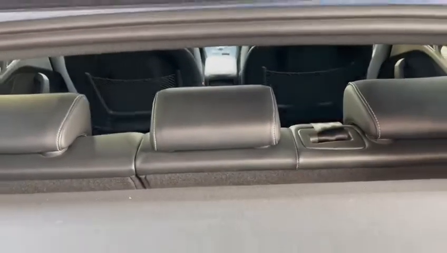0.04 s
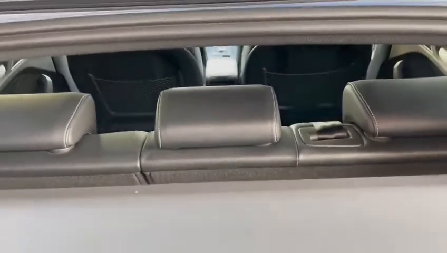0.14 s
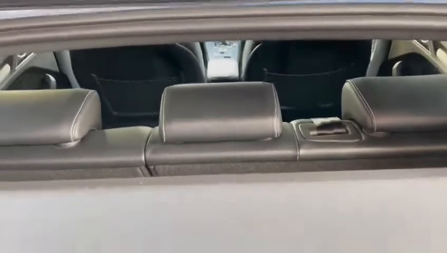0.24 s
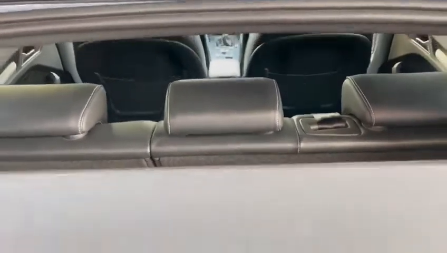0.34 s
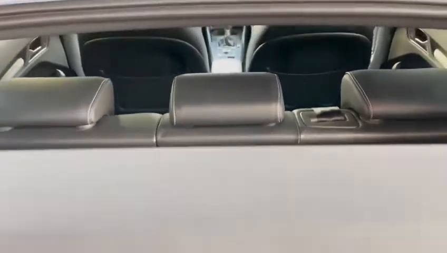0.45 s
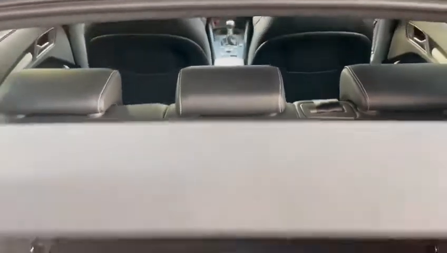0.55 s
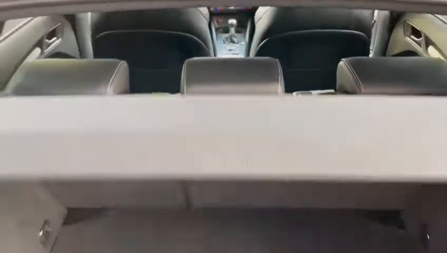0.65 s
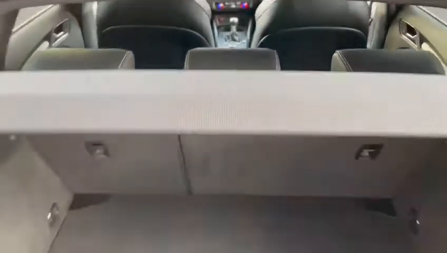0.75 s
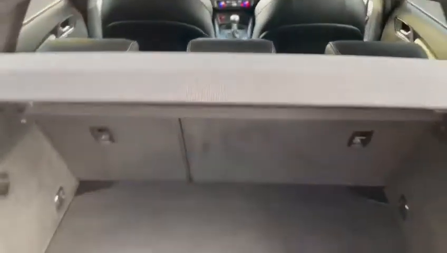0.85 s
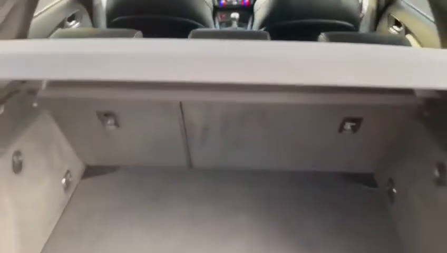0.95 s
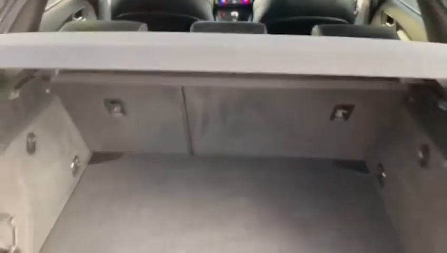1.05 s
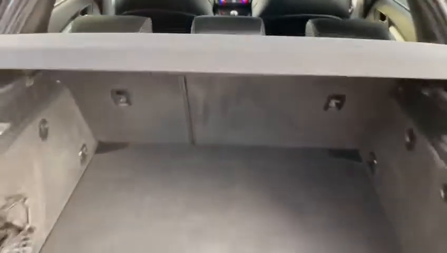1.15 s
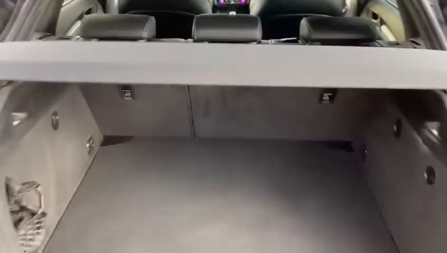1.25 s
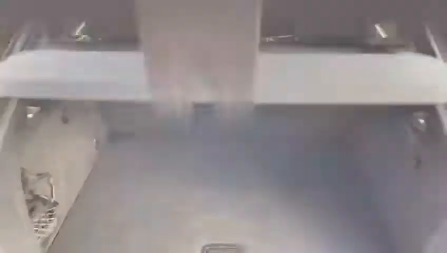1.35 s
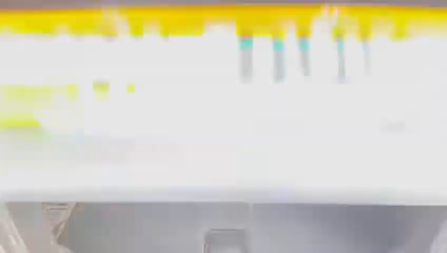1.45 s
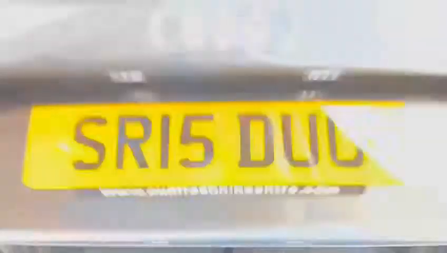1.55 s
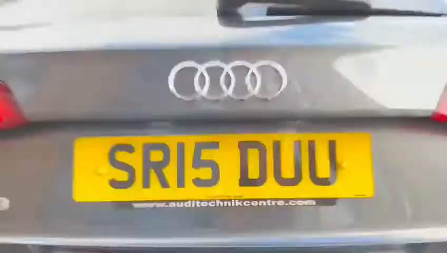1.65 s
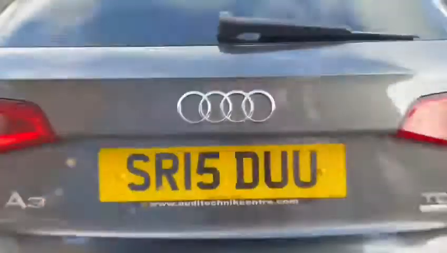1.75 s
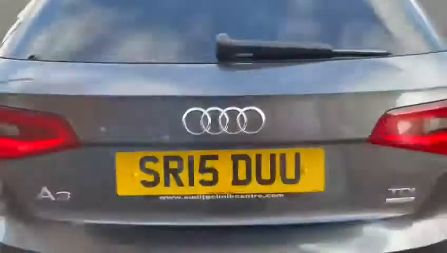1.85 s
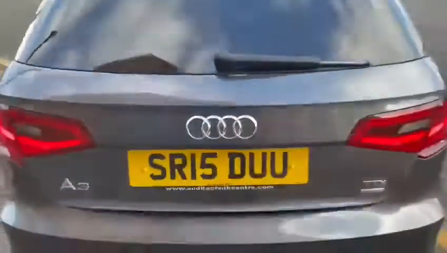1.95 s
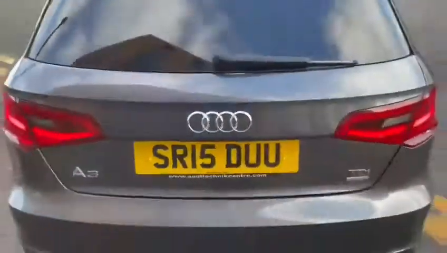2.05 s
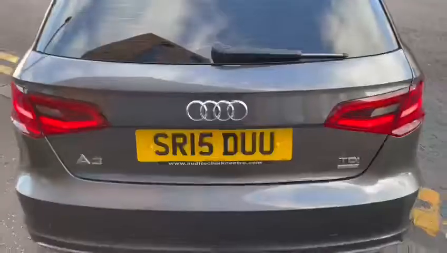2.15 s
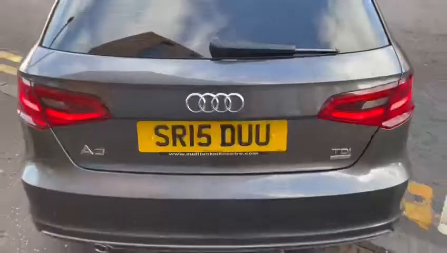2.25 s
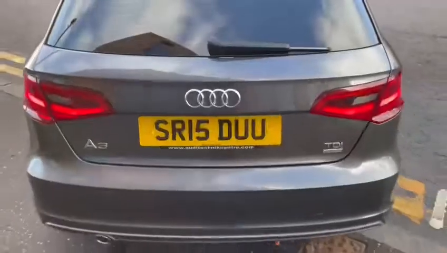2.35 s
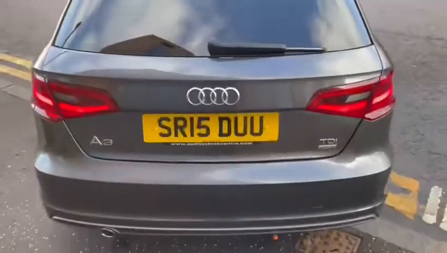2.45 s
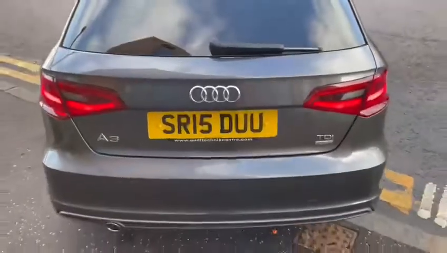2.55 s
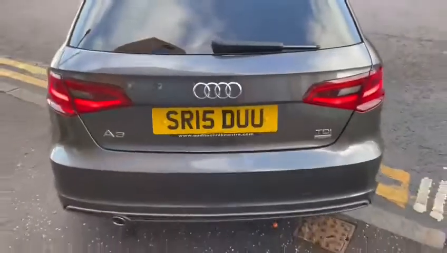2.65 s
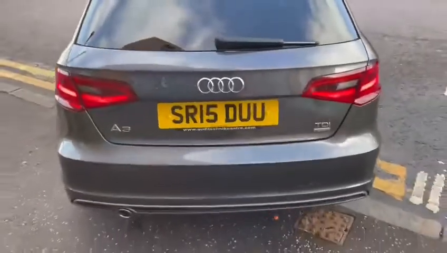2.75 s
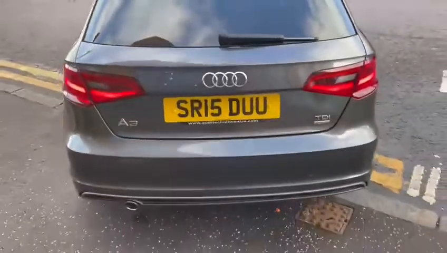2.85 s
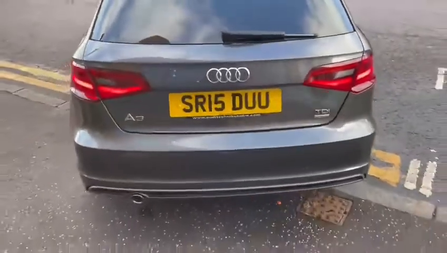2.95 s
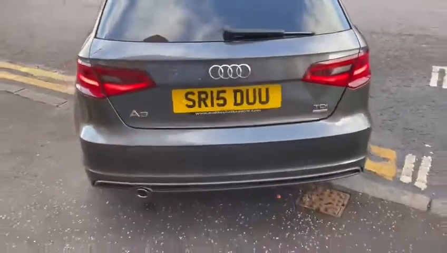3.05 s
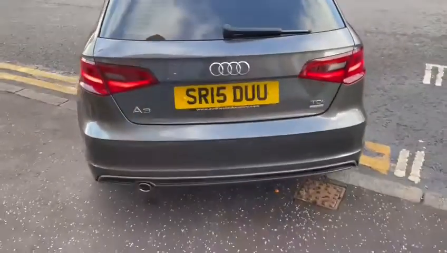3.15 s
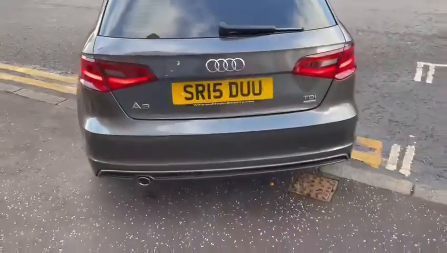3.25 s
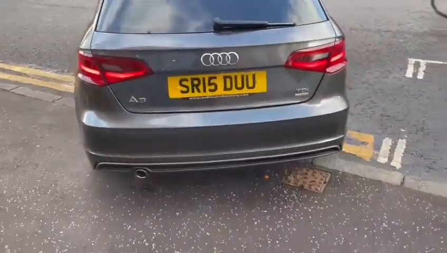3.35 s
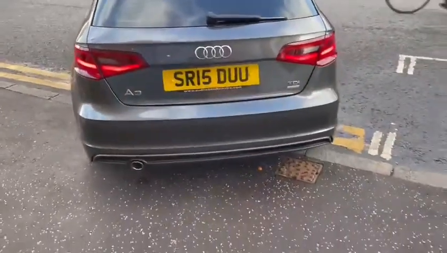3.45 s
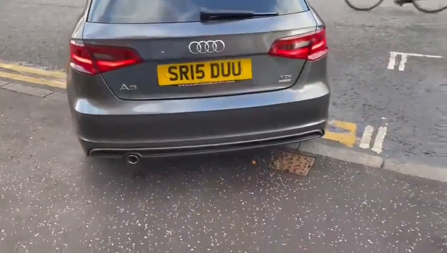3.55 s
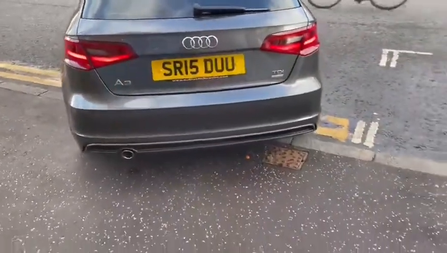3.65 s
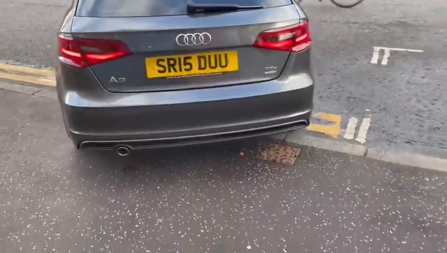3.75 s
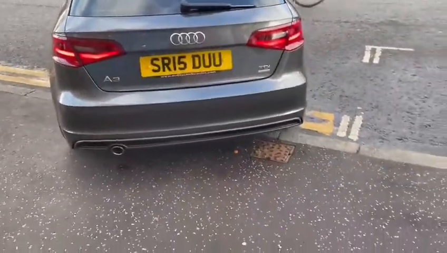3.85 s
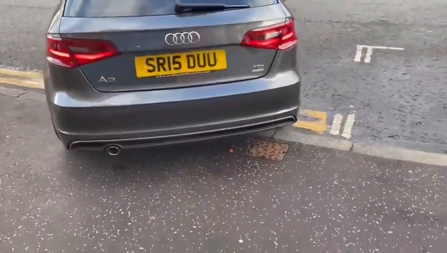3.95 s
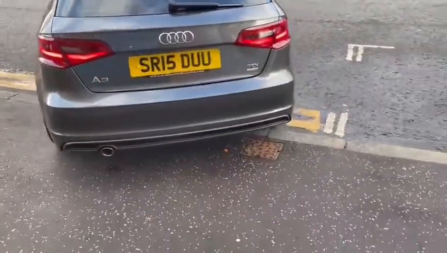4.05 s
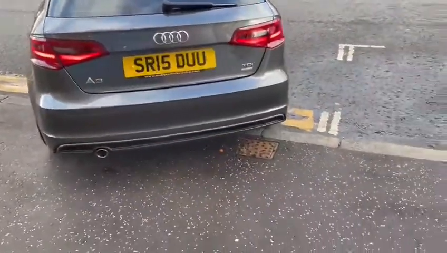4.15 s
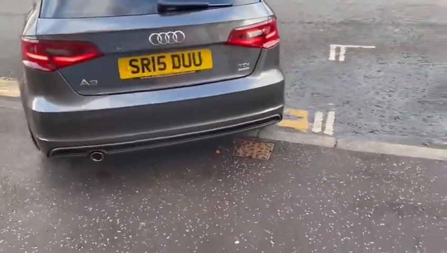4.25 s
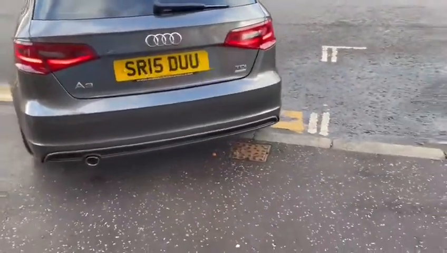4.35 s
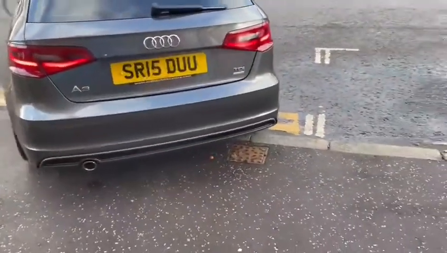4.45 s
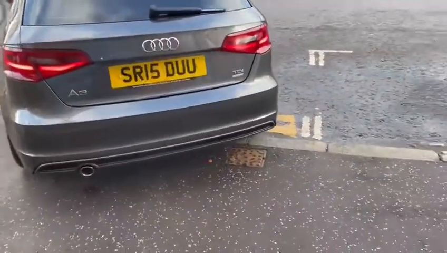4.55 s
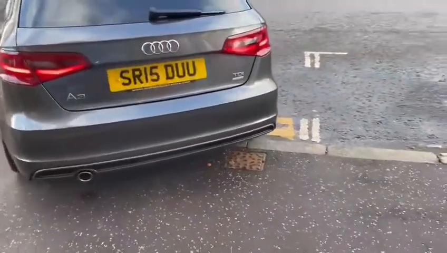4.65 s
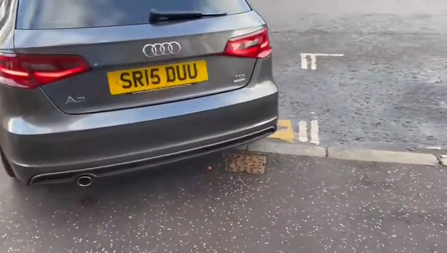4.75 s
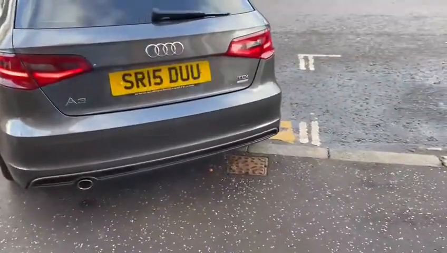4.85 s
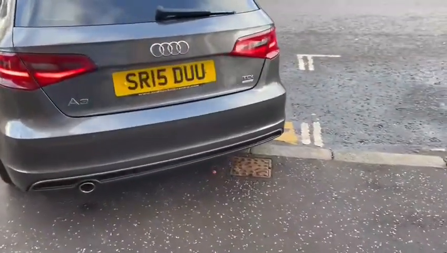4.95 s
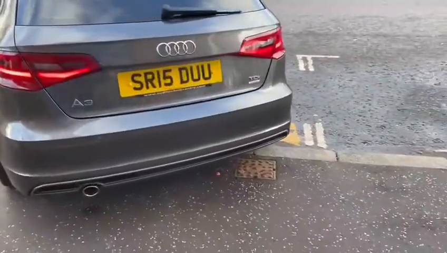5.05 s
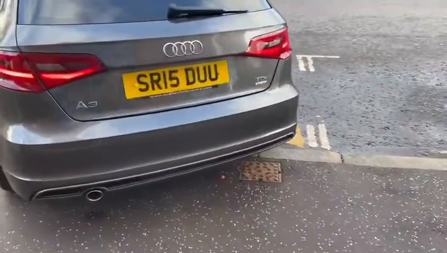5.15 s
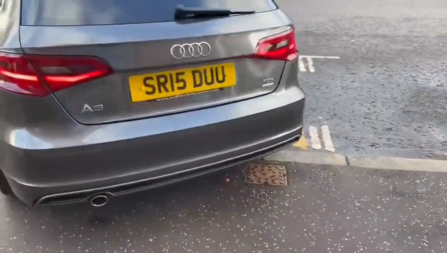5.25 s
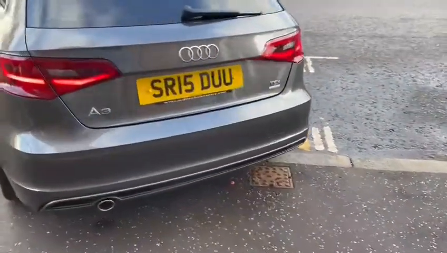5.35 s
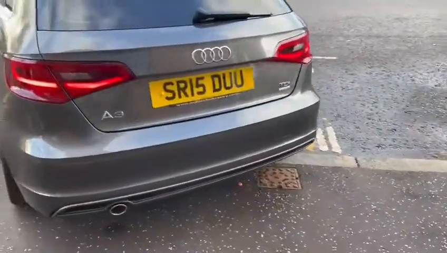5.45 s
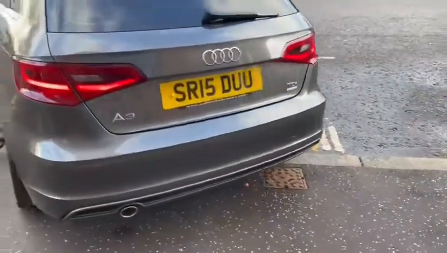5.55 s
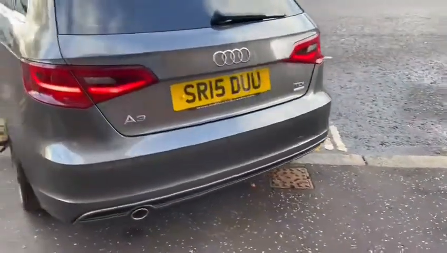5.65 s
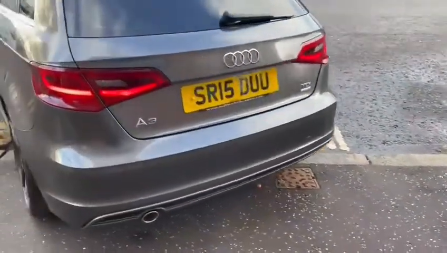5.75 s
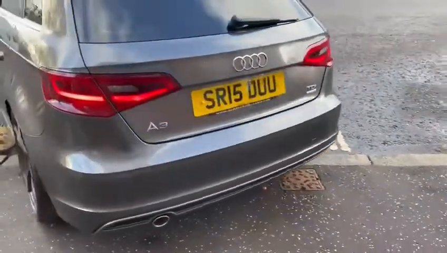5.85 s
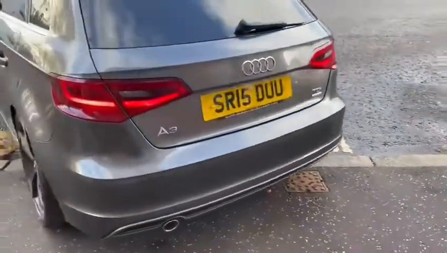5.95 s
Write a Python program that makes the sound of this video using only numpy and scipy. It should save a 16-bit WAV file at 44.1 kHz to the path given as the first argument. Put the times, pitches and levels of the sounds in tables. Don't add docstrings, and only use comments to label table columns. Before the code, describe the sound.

Outdoors on a town street, heard through a hand-held phone close to a car. From 0 s a steady, blurred low traffic drone runs throughout, with gentle swells of tyre hiss and a faint wavering low machine hum. Air buffets the microphone in soft low thumps, heaviest around 1.0-1.6 s, while cloth or struts rub and fine grit ticks near 0.8-1.5 s. At about 1.92 s the tailgate latch hits in a rapid clatter of bright metallic cracks, peaking near 1.97 s with a massive low thud, ringing panels and a boom of cabin air. Smaller rattles and a short diffuse street echo fade by roughly 2.3 s. Until 6 s the traffic continues with gusts, faint singing tyres around 3 to 5 s, light scuffs and isolated ticks, the sharpest near 3.75 s.

```python
import sys
import numpy as np
from scipy import signal
from scipy.fft import rfft, irfft, next_fast_len
from scipy.io import wavfile
from scipy.ndimage import uniform_filter1d, map_coordinates

SR = 44100
rng = np.random.default_rng(int(sys.argv[2]) if len(sys.argv) > 2 else 0)


def store_pcm(level_fs):
    pcm = np.round(np.clip(level_fs, -1, 1) * 32767).astype(np.int16)
    wavfile.write(sys.argv[1], SR, np.atleast_2d(pcm).T)


def nominal_scale(level):
    x = np.asarray(level, float) / 20
    return 10 ** x


N = 265041

# [f/Hz, level/dB]
FLUTTER = [(50, -35), (95, 7), (140, 7.5), (220, -5), (330, -7.5), (600, -55)]


def unit(x):
    return x / np.sqrt(np.mean(x ** 2) + 1e-20)


def along(points, hz):
    f, v = np.transpose(points)
    return np.interp(np.log(hz + 1), np.log(f + 1), v)


def curves(rows):
    s, *cols = np.transpose(rows)
    return [np.interp(np.arange(N) / SR, s, c) for c in cols]


def wobble(rate):
    knots = rng.standard_normal(int(N * rate / SR) + 4)
    return map_coordinates(knots, [np.arange(N) * rate / SR])


def swells(rows, floor_db):
    s, length, db = np.transpose(rows)[..., None]
    t = np.arange(0, N, 32) / SR
    bells = nominal_scale(db) * np.exp(-(2 * (t - s) / length) ** 2 / 2)
    gain = np.sqrt(nominal_scale(floor_db) ** 2 + np.sum(bells ** 2, axis=0))
    return np.interp(np.arange(N) / SR, t, gain)


def filtered(x, response):
    n = x.shape[-1]
    m = next_fast_len(n + 8192)
    return irfft(rfft(x, m) * response(np.fft.rfftfreq(m, 1 / SR)), m)[..., :n]


def rush(spectrum, patchy_db, count=N):
    z = signal.stft(rng.standard_normal(count + 512), nperseg=512)[2]
    patches = uniform_filter1d(rng.standard_normal(z.shape), size=6, axis=0)
    patches = uniform_filter1d(patches, size=12, axis=1)
    x = signal.istft(z * nominal_scale(patchy_db * unit(patches)), nperseg=512)[1][:count]
    return unit(filtered(x, lambda hz: nominal_scale(along(spectrum, hz))))


def steady(x, size):
    return unit(x / np.sqrt(np.abs(uniform_filter1d(x ** 2, size)) + 0.35))


def add(track, s, piece):
    part = track[..., round(s * SR):][..., :piece.shape[-1]]
    part += piece[..., :part.shape[-1]]


def stereo(mid, side):
    return np.array([mid + side, mid - side])


def pushes(rows):
    out, t = np.zeros(N), np.arange(SR // 2) / SR
    for s, hz, db, rise, t60 in rows:
        envelope = nominal_scale(db - 60 * (t / t60) ** 1.8) * (1 - np.exp(-t / rise))
        add(out, s, envelope * np.sin(2 * np.pi * hz * t))
    return out


def town():
    # [f/Hz, level/dB per Hz]
    drone = [(120, -26), (200, -6), (244, -6.5), (294, -3.5), (324, -11.5), (720, -8), (1390, -16),
             (1640, -17.5), (1790, -17), (6000, -42.5), (7800, -58), (13200, -120)]
    # [f/Hz, level/dB per Hz]
    wide = [(24, -42), (40, -31), (70, -14), (201, -12), (287, -3.5), (326, -11), (836, -2.5),
            (1600, -13.5), (2440, -24.5), (6000, -44.5), (7800, -58), (13200, -120)]
    # [f/Hz, level/dB]
    hiss_colour = [(1500, -11.5), (3000, -5), (5000, -5.5), (7000, -10), (9000, -8.5), (11300, -12.5),
                   (12300, -12), (14000, -87)]
    # [t/s, level/dB]
    traffic = [(0, -48.5), (.9, -48.5), (1.3, -46.5), (2.24, -46), (2.6, -46.5), (4.95, -46.5),
               (5.15, -47.5), (6.01, -48)]
    # [peak t/s, length/s, level/dB]
    wash_swells = [(0, 0.26, -57.5), (.91, 0.35, -60.5), (1.45, 0.45, -58), (2.9, 0.5, -65.5),
                   (3.4, 0.67, -58.5), (4.95, 0.43, -58.5), (5.5, 0.92, -62.5)]
    # [peak t/s, length/s, level/dB]
    hum_swells = [(1.2, .25, -47.5), (1.75, 0.23, -43), (2.35, 0.29, -47.5), (4.07, 0.17, -44.5),
                  (4.75, 0.33, -44.5), (5.25, 0.35, -48), (5.7, 0.23, -49)]
    # [f/Hz, width/Hz, level/dB, nearest t/s, duration/s]
    tyres = [
        (738, 60, -55, 2.9, 1.3),
        (2210, 44, -62, 3.5, 0.96),
        (1600, 37, -58, 4.8, 0.59),
    ]

    t = np.arange(N) / SR
    drone_db, = curves(traffic)
    ahead = nominal_scale(drone_db + 1.5 + 0.34 * wobble(7.05)) * rush(drone, patchy_db=1.47)
    aside = nominal_scale(drone_db + 2.5 + 1.8 * wobble(5.1)) * rush(wide, patchy_db=2.5)

    wash = swells(wash_swells, floor_db=-64.5)
    hiss = wash * nominal_scale(-4.5 + 1.2 * wobble(20)) * rush(hiss_colour, patchy_db=1.5)
    side_colour = hiss_colour[:3] + [(7200, -12), (8500, -48)]
    side_hiss = wash * nominal_scale(-10.0) * rush(side_colour, patchy_db=0.5)

    hum_hz = 295.2 + 1.316 * wobble(1.5)
    hum_phase = 2 * np.pi * np.cumsum(hum_hz) / SR + 0.47 * wobble(7.3)
    hum = swells(hum_swells, floor_db=-71.5) * nominal_scale(-1.0 + 1.3 * wobble(5.07)) * np.sin(hum_phase)

    song = np.zeros(N)
    for hz, width, db, nearest, span in tyres:
        passing = nominal_scale(db - 4.0 * ((t - nearest) / span) ** 2)
        song += passing * wobble(width) * np.sin(2 * np.pi * hz * t)
    return stereo(ahead + hiss + hum + song, aside + 0.17 * hum + side_hiss)


def air():
    # [f/Hz, level/dB]
    rumble_colour = [(15, -55), (30, -18), (44, 2.5), (62, 11), (85, 2.5), (130, -17), (300, -60)]
    # [peak t/s, length/s, level/dB, flutter over rumble/dB]
    gusts = [(0.027, 0.17, -41.5, -11), (0.303, 0.39, -45.5, -11), (0.553, 0.13, -39, -3.5),
             (0.707, 0.034, -42, 1), (0.912, 0.19, -36, -13), (1.226, .3, -31.5, -4),
             (1.428, 0.036, -34.5, 2.5), (1.56, 0.27, -37, -2), (1.739, 0.056, -36, -14.5),
             (1.89, .06, -32.5, -5), (2.304, 0.48, -39, -4.5), (2.6, 0.16, -33, -5.5),
             (2.877, .18, -34, -13.5), (3.114, 0.18, -41.5, -5.5), (3.424, 0.23, -40.5, -4.5),
             (3.674, 0.066, -37.5, -9), (3.893, 0.43, -41.5, -7), (4.222, 0.1, -36, -14),
             (4.452, 0.15, -42, -7.5), (4.58, 0.21, -40, -16), (4.795, 0.15, -35, -12),
             (4.973, 0.12, -35.5, -13), (5.24, .05, -42.5, -16), (5.4, 0.12, -45.5, -14),
             (5.54, .08, -40.5, -25), (5.687, 0.12, -49.5, 6.5), (5.87, 0.11, -39.5, -11)]
    # [t/s, f/Hz, level/dB]
    slaps = [(1.025, 65, -17), (1.088, 108, -29), (1.174, 150, -20.5), (1.184, 64.5, -14.5),
             (1.2445, 71.4, -21), (1.259, 179.4, -21), (1.284, 95, -18.5), (1.389, 290, -28.5),
             (1.413, 75.6, -15), (1.455, 74, -32), (1.498, 71.5, -22.5), (1.543, 78, -20),
             (1.5765, 73, -14.5), (1.645, 144, -26)]
    # [t/s, level/dB]
    crosswind = [(0, -12), (.75, -20), (.9, -4), (2.4, -8), (3.3, -13), (3.8, -19), (6.01, -22)]

    rumble = swells([(s, length, db) for s, length, db, _ in gusts], floor_db=-45)
    flutter = swells([(s, length, db + over_db) for s, length, db, over_db in gusts], floor_db=-50.5)
    low = rumble * nominal_scale(2.84 * wobble(22)) * steady(rush(rumble_colour, patchy_db=1.7), size=1600)
    high = flutter * nominal_scale(3.1 * wobble(35)) * steady(rush(FLUTTER, patchy_db=0.0), size=1600)

    side_low = rumble * rush(rumble_colour, patchy_db=3)
    side_high = flutter * nominal_scale(2.5) * rush(FLUTTER, patchy_db=0.0)
    side = nominal_scale(*curves(crosswind)) * (side_low + side_high)
    rise_s, t60_s = 0.0021, 0.053
    slapping = pushes([(*slap, rise_s, t60_s) for slap in slaps])
    return stereo(low + high + slapping, side)


def scuffs():
    # [t/s, length/s, level/dB, centre f/Hz, width/octaves]
    rubs = [(0.297, 0.1, -60.5, 6640, 1), (0.875, 0.12, -61, 8000, 1.4), (2.467, 0.012, -48, 900, 0.4),
            (1.153, 0.14, -48, 1040, 0.21), (1.251, 0.11, -50.5, 1090, 0.22),
            (1.169, 0.071, -45, 332, 0.32), (0.544, 0.23, -54, 320, 0.68), (1.347, 0.086, -59, 8600, 0.45),
            (1.383, 0.042, -49, 1500, 0.55), (1.491, 0.081, -54, 4500, 1.2),
            (2.802, 0.23, -68.5, 9500, 0.31), (3.281, 0.12, -61.5, 9600, 0.42),
            (3.514, 0.062, -63.5, 5010, 0.94), (4.745, 0.084, -69, 8500, .8), (5.698, 0.05, -64, 9100, 0.5),
            (5.92, 0.084, -70.5, 4500, 0.35)]
    # [t/s, peak level/dB, f/Hz]
    ticks = [(0.8064, -43, 10100), (0.8738, -35.5, 9100), (0.8974, -53, 5920), (0.9194, -57, 4650),
             (0.9612, -52, 4810), (0.9615, -48, 10000), (1.387, -46, 4830), (1.418, -48, 4760),
             (1.499, -50, 5340), (1.527, -52, 5290), (1.5444, -59, 5600), (3.1462, -45.5, 4500),
             (3.148, -50, 9000), (3.541, -52, 8500), (2.587, -52, 10500), (3.42, -44.5, 4330),
             (3.5236, -52, 4220), (3.6114, -52, 4510), (3.7166, -47, 10800), (3.7494, -32, 6530),
             (4.7795, -48, 4720), (5.5567, -57, 4390), (5.7184, -52, 5210)]

    out = np.zeros(N)
    for s, length, db, hz, octaves in rubs:
        u = np.linspace(0, 1, int(length * SR))
        grain = nominal_scale(2.2 * unit(uniform_filter1d(rng.standard_normal(SR // 4), size=120)))
        band = lambda f: np.exp(-.5 * (np.log2(f / hz + 1e-6) / octaves) ** 2) * (f < 12000)
        noise = unit(filtered(grain * rng.standard_normal(SR // 4), band))
        add(out, s, nominal_scale(db + 4) * np.sin(np.pi * u ** 0.51) ** 1.1 * noise[:len(u)])

    t = np.arange(300) / SR
    cycles = 2.5
    for s, db, hz in ticks:
        bell = np.exp(-((t * hz - 2 * cycles) / cycles) ** 2)
        add(out, s, nominal_scale(db) * bell * np.sin(2 * np.pi * hz * t))
    return out * nominal_scale([[1.8], [-1.8]])


def street(x):
    # [f/Hz, t60/s]
    decay = [(200, 0.27), (2000, 0.23), (10000, 0.33)]
    hz, t, z = signal.stft(rng.standard_normal((2, SR // 2)), SR, nperseg=256)
    mid, side = signal.istft(z * nominal_scale(-60 * t / along(decay, hz)[:, None]), SR, nperseg=256)[1]
    side = filtered(side, lambda f: f < 6000)
    echo = stereo(mid, 0.72 * side) / np.linalg.norm(mid)
    return signal.fftconvolve(x[None], echo, axes=1)[:, :N]


def panel(f):
    # [f/Hz, width/Hz, level/dB]
    modes = [(378, 31, -2.5), (572, 27, 8.5), (677, 21, 0), (876, 54, -29), (976, 50, -15),
             (1116, 23, 11.5), (1470, 39, -0.5), (1905, 27, 6.5), (2700, 370, -16), (5200, 462, -28)]
    response = nominal_scale(-1.5)
    for k, (centre, width, db) in enumerate(modes):
        mode = 1j * f * width / (centre * centre - f * f + 1j * f * width)
        response = response + (-1) ** k * nominal_scale(db) * mode
    return response


def latch():
    # [t/s, peak level/dB, brightness/dB per octave, loudest ring f/Hz]
    contacts = [(1.9154, -10, 0, 800), (1.926, -7, 3, 6750), (1.934, -15, -2, 686),
                (1.9458, -11.5, 1, 2900), (1.952, -20, -4.5, 1140), (1.971, -17.5, 6, 2500),
                (1.9755, -6, 1.5, 1990), (1.999, -11.5, -1, 2250), (2.011, -22.5, -1.5, 1200),
                (2.03, -28, 4, 1140), (2.045, -18, 0.1, 2320), (2.059, -31, -3.5, 1900),
                (2.0842, -32, -5.5, 1800), (2.2066, -35.5, 0.5, 1955)]
    # [f/Hz, level/dB]
    crack = [(100, 8), (300, 3.5), (1000, -2.5), (3000, -15), (7000, -25), (9500, -29), (11500, -30.5),
             (12600, -49), (15000, -90)]
    # [f/Hz, level/dB]
    off_axis = [(300, -21), (1200, -15.5), (3000, -6.5), (6000, -6.5), (10000, -15)]

    out, t = np.zeros((2, N)), np.arange(SR // 4) / SR
    decay = nominal_scale(-60 * t / 0.064) + nominal_scale(1.5 - 60 * t / 0.0093)
    envelope = decay * (1 - np.exp(-t / 0.00099))
    for s, db, bright_db, ring_hz in contacts:
        def colour(f):
            tilt = bright_db * np.log2(f / 1000 + 0.04)
            ring = 5.6 * np.exp(-(np.log2(f / ring_hz + 0.011) / 0.38) ** 2)
            return nominal_scale(along(crack, f) + tilt + ring)

        bounce = unit(uniform_filter1d(rng.standard_normal(len(t)), size=90))
        chatter = nominal_scale(2.3 * np.minimum(t / 0.0053, 1) * bounce)
        noise = filtered(chatter * rng.standard_normal((2, len(t))), colour)
        noise = noise / np.std(filtered(noise, lambda f: f > 1000))
        mid, side = filtered(noise * envelope, panel)
        side = filtered(side + 0.43 * mid, lambda f: nominal_scale(along(off_axis, f)))
        add(out, s, nominal_scale(db - 9.0) * stereo(mid, side))
    return out


def tailgate():
    # [t/s, f/Hz, level/dB, rise/s, t60/s]
    thuds = [(1.928, 104, -21, 0.012, 0.052), (1.962, 140, -14, 0.0034, 0.05),
             (1.974, 290, 0.5, 0.0075, 0.027), (1.977, 376, -9.5, 0.0026, 0.035),
             (1.9725, 60, -7, 0.011, 0.056), (1.9885, 58.4, -3, 0.00056, 0.074),
             (1.929, 700, -16, .004, 0.041), (2.125, 338, -35.5, .005, .06),
             (2.019, 179, -16.5, 0.0059, 0.1), (2.04, 236, -14.5, 0.00092, 0.034),
             (2.05, 65, -6, 0.0092, 0.052), (2.1, 61.7, -22.5, 0.0029, 0.23),
             (2.11, 214, -32.5, 0.0088, 0.18), (2.165, 67.2, -30, .01, 0.35),
             (2.19, 69.7, -13, 0.003, 0.04)]
    rattle = latch()
    blows = pushes(thuds)
    shudder = np.abs(uniform_filter1d(np.abs(blows), size=1800)) * rush(FLUTTER, patchy_db=2)
    late_blows = np.roll(blows, shift=2400)
    body = stereo(blows + nominal_scale(-18.5) * shudder, nominal_scale(-24) * shudder + nominal_scale(-21) * late_blows)
    return rattle + nominal_scale(-11.5) * street(rattle.mean(0)) + body


def scene():
    return town() + air() + scuffs() + tailgate()


def roll_off(x):
    return signal.sosfilt(signal.butter(12, 12800, fs=SR, output="sos"), x)


def record(dry):
    ports_hz = [6260, 8240, 7970, 11020]
    mic_hz, top_hz = 46.6, 11720

    def edges(hz):
        low_edge = (1j * hz) ** 2 / (mic_hz ** 2 - hz ** 2 + 1.3j * hz * mic_hz)
        return low_edge / (1 + (hz / top_hz) ** 40)

    def port_phases(hz):
        turn = np.pi / 2 * np.interp(hz, ports_hz, np.array([0.062, 1.07, 0.95, 1.8]))
        return np.exp(1j * np.array([-turn, turn]))

    wet = filtered(dry, lambda hz: edges(hz) * port_phases(hz))
    mix = wet / (1 + np.abs(wet / 1.05) ** 5) ** (1 / 5)
    return roll_off(mix)


dry = scene()
out = record(dry)
store_pcm(out)
```